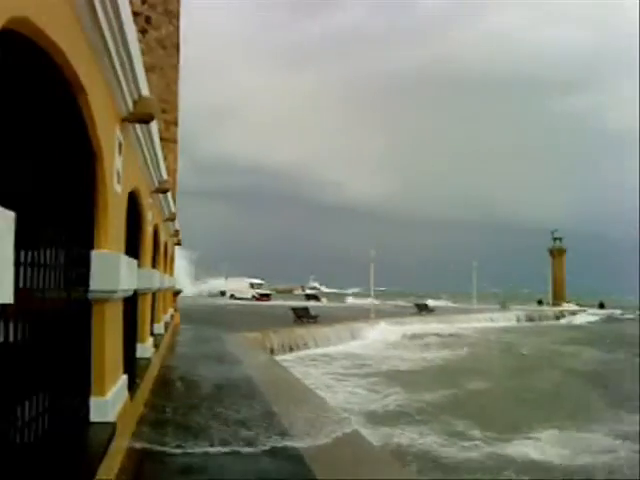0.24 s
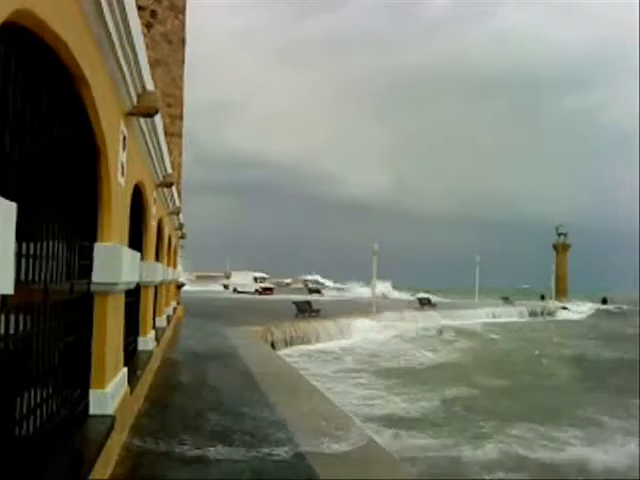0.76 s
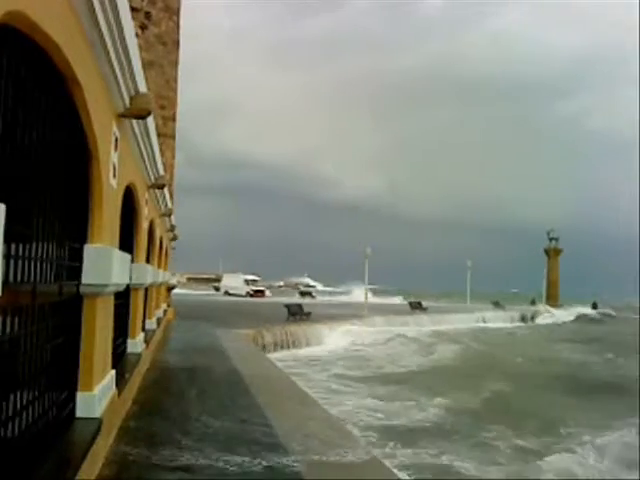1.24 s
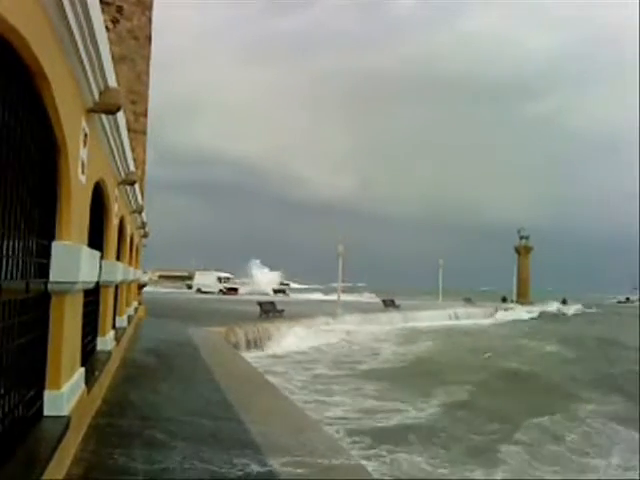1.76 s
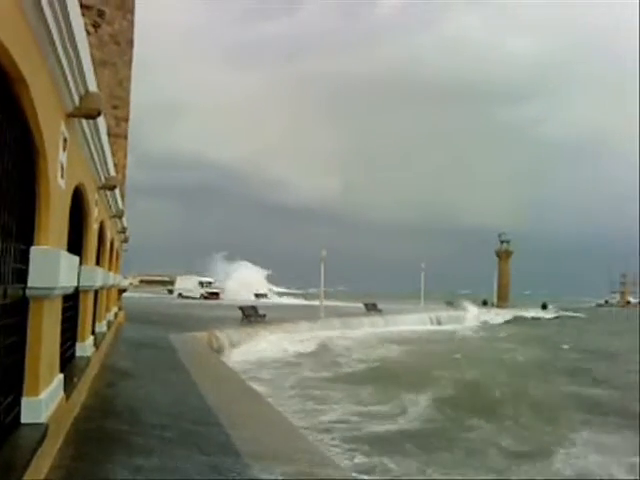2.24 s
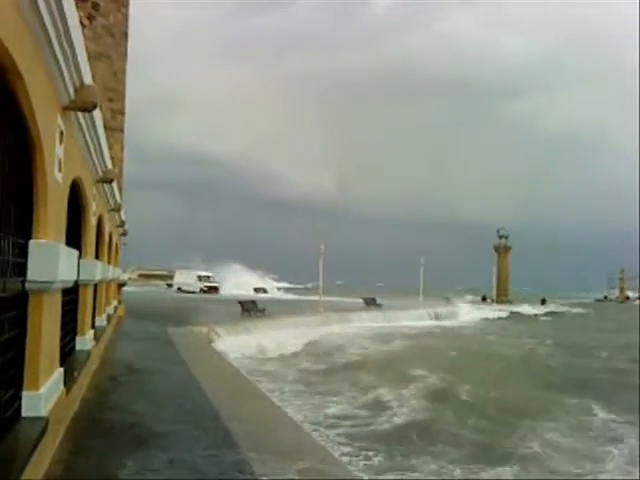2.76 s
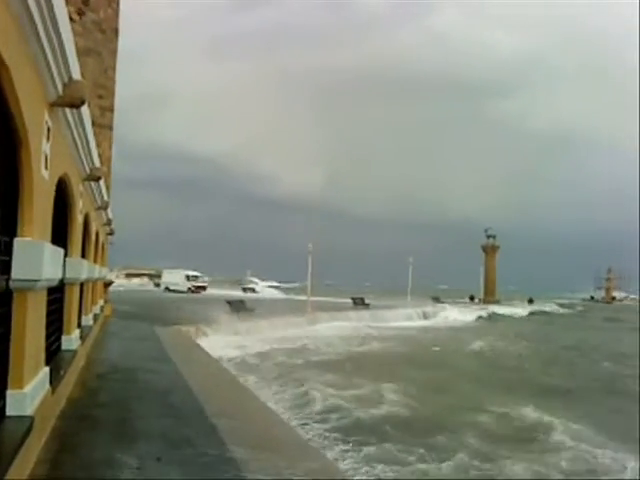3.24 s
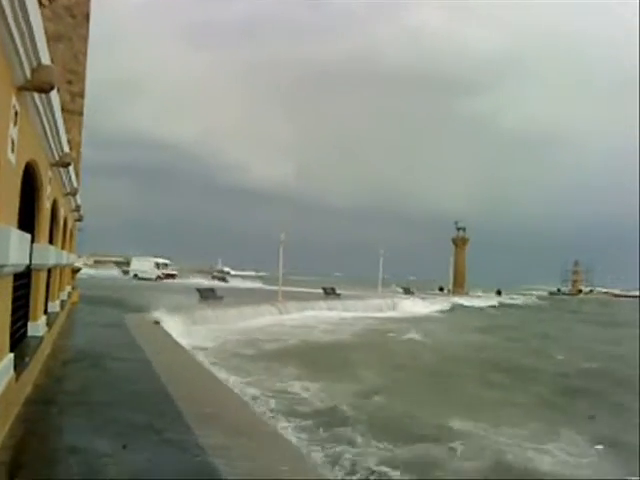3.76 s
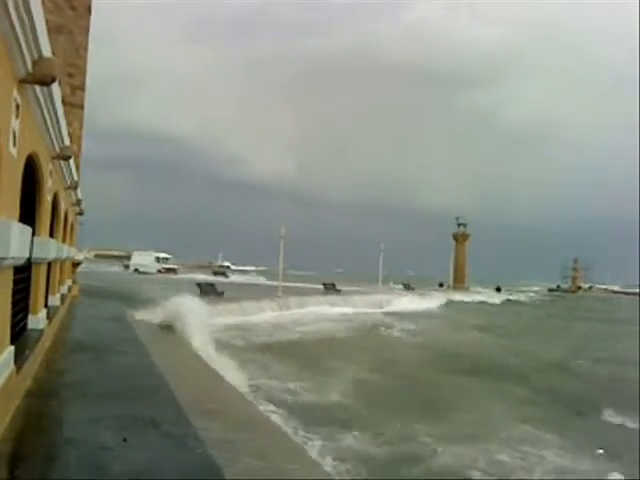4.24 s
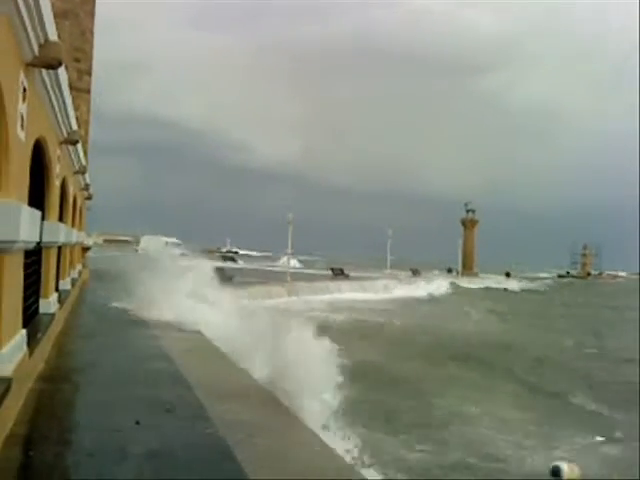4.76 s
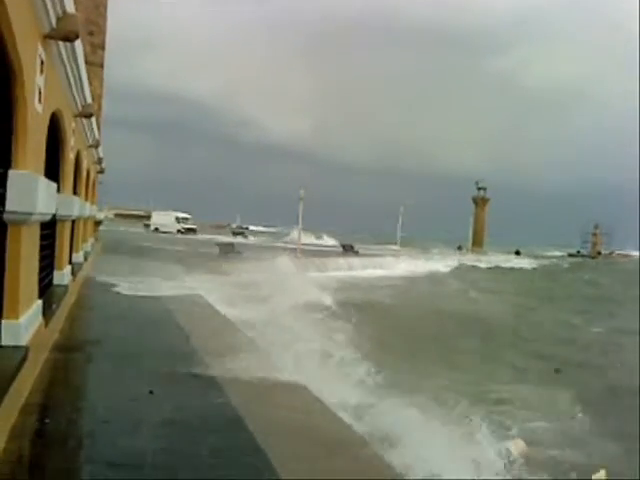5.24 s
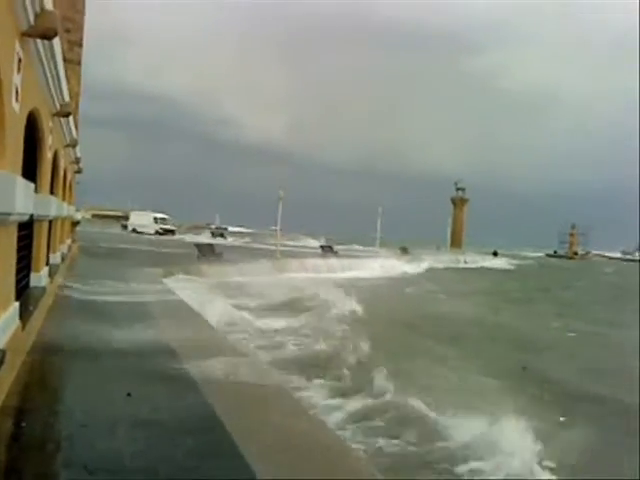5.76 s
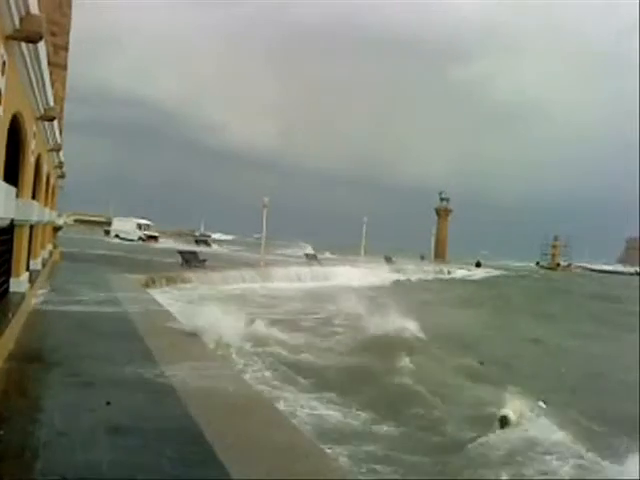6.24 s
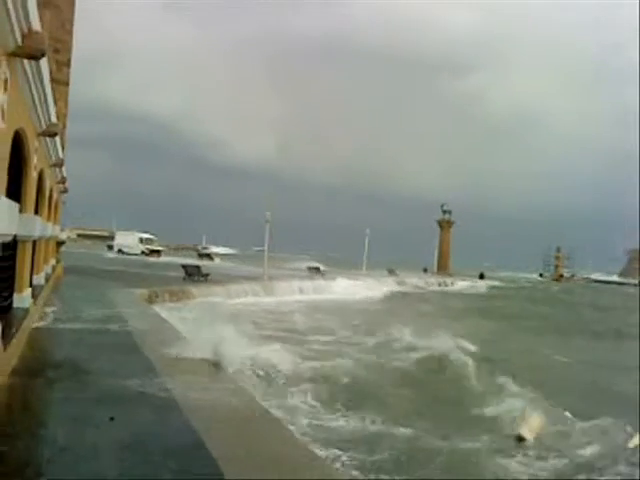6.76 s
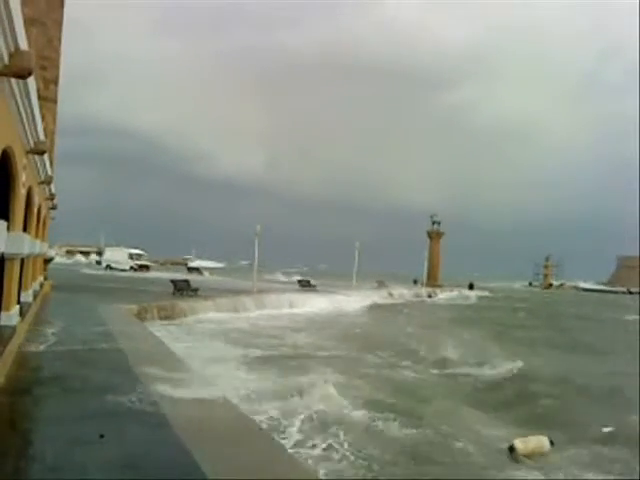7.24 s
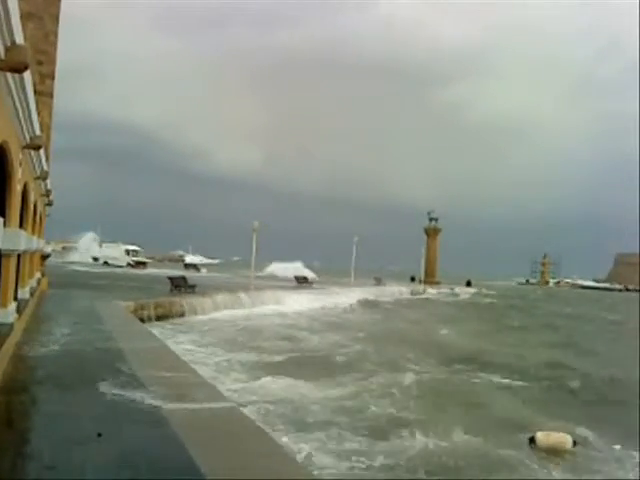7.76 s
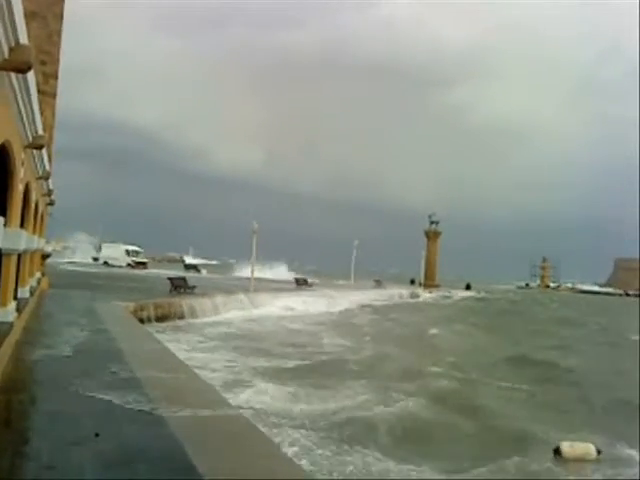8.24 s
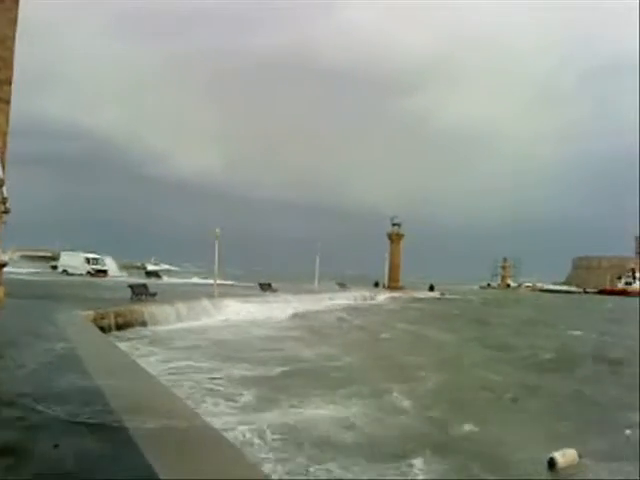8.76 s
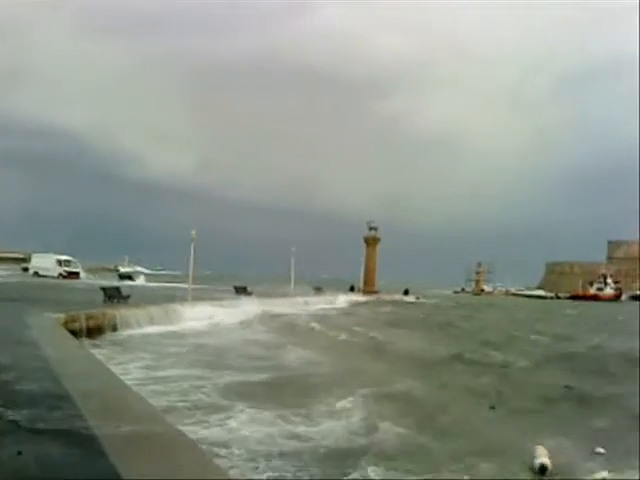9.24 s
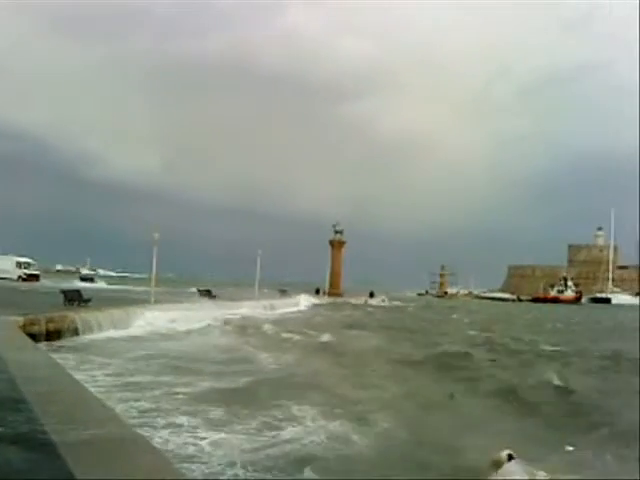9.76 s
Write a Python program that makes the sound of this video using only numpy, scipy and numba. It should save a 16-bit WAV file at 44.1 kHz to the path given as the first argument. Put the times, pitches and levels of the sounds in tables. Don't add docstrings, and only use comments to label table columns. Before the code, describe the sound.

An open harbour quay in a gale, heard through a small unprotected camera microphone. Wind dominates from the first instant: low irregular thumps, rough tearing flutter and sharp spitting puffs. Behind it surf hisses and roars along the stone wall, swelling from about two seconds, with waves slapping around four and a half. Short lulls uncover the foam, then the blows return; automatic gain makes the sea duck and creep back.

```python
import sys
import numpy as np
from scipy import signal
from scipy.fft import rfft, irfft
from scipy.io import wavfile
from scipy.ndimage import uniform_filter1d
from numba import njit

SR = 44100
rng = np.random.default_rng(int(sys.argv[2]) if len(sys.argv) > 2 else 0)


def master_out(mix):
    frames = np.transpose(np.atleast_2d(mix))
    ceiling = np.clip(frames, -1, 1)
    pcm = np.round(ceiling * 32767).astype(np.int16)
    wavfile.write(sys.argv[1], SR, pcm)


def amplitude_ratio(level_db):
    exponent = np.asarray(level_db, float) / 20
    return 10 ** exponent


N = 441000


def unit(x):
    return x / np.sqrt(np.mean(x ** 2))


def curves(table):
    s, *columns = np.transpose(table)
    return [np.interp(np.arange(N) / SR, s, c) for c in columns]


def colour(x, shape):
    hz, db = np.transpose(shape)
    log_hz = np.log(np.arange(1, N // 2 + 2) * SR / N)
    gain_db = np.interp(log_hz, np.log(hz), db, -90, -90)
    return irfft(rfft(x) * amplitude_ratio(gain_db), N)


@njit
def lowpass(x, corner_hz, damp):
    y, band, low = np.empty(len(x)), 0., 0.
    for i in range(len(x)):
        g = np.tan(np.pi * corner_hz[i] / SR)
        v = (band + g * (x[i] - low)) / (1 + g * (g + damp))
        y[i] = low + g * v
        band = 2 * v - band
        low = 2 * y[i] - low
    return y


def walk(rate_hz):
    k = int(SR / rate_hz)
    held = np.repeat(rng.standard_normal(N // k + 1), k)[:N]
    slewed = uniform_filter1d(held, k)
    return unit(uniform_filter1d(slewed, k))


def churn(slow_db, quick_db, slow_hz, quick_hz):
    flutter_db = slow_db * walk(slow_hz) + quick_db * walk(quick_hz)
    return rng.standard_normal(N) * amplitude_ratio(flutter_db)


def spells(start_s, length_s, height, edge_s):
    t, out = np.arange(N) / SR, np.zeros(N)
    for s, length, h in zip(start_s, length_s, height):
        at = slice(max(int((s - edge_s) * SR), 0), int((s + length + edge_s) * SR))
        ramp = np.minimum(t[at] - s, s + length - t[at]) / edge_s
        out[at] += h * np.sin(np.pi / 4 * (1 + np.clip(ramp, -1, 1))) ** 2
    return out


def swells(base_db, events, edge_s, lift_db=0):
    start_s, length_s, peak_db = np.transpose(events)
    extra_power = spells(start_s, length_s, amplitude_ratio(2 * (peak_db + lift_db)), edge_s)
    return 10 * np.log10(amplitude_ratio(2 * base_db) + extra_power)


def ducking():
    # start_s, drop_db
    ducks = [
        (2.249, 9),
        (2.9, 3.5),
        (4.76, 4.5),
        (6.46, 7.5),
        (6.65, 4),
        (7.72, 3.5),
        (8.19, 4.5),
        (8.27, 4.5),
        (8.74, 3.5),
    ]
    attack_s, recover_s = 0.017, 0.83
    t, gain_db = np.arange(N) / SR, np.zeros(N)
    for s, drop_db in ducks:
        since_s = np.maximum(t - s, 0)
        gain_db -= drop_db * (1 - np.exp(-since_s / attack_s)) * np.exp(-since_s / recover_s)
    return gain_db


def surf():
    # start_s, hiss_db, roar_above_hiss_db
    sea_levels = [(0.0, -43, 5), (0.3, -48.5, 0.5), (1.3, -42.5, -3.5), (1.5, -37.5, -3), (2.1, -36, -2),
                  (2.7, -35.5, -1.5), (3.0, -36.5, 1), (3.7, -44, 0), (4.05, -38.5, -1.7), (4.7, -41, 1),
                  (5.75, -35, -2), (6.4, -36, -2), (7.1, -41.5, -0.3), (7.6, -36.5, -1.5), (8.1, -38, 0.3),
                  (9.5, -40, 0), (9.66, -35.5, -4), (10.0, -35.5, -1)]
    # start_s, length_s, surf_rise_db, slam_above_hiss_db
    waves = [(0.0, 0.11, 0, -7), (0.293, .05, 2, 9), (1.055, 0.32, 1, -14), (1.813, 0.26, 1.5, -5),
             (3.107, 0.091, -0.7, 7), (4.28, .1, 1.5, -12), (4.47, 0.14, 0.1, 6), (4.66, .08, .2, 4),
             (4.84, .08, 0, 5), (4.992, 0.32, -1, 3), (6.15, 0.11, 1.5, -11), (6.67, 0.033, -1.5, 10.5),
             (7.548, 0.1, -0.5, -4), (7.937, 0.12, 1, -5), (8.24, 0.041, 2, -1), (8.66, 0.069, 1.5, 7),
             (9.597, 0.11, 3.5, -16)]
    # freq_hz, level_db (per Hz)
    roar_shape = [(60, -27.5), (150, 8), (400, 15), (900, 12), (1300, 15.5), (1820, 15.5), (2180, 9),
                  (3000, 1.5), (4000, -13.5)]
    # freq_hz, level_db (per Hz)
    hiss_shape = [(1500, -19), (2800, -2), (4500, -1), (5300, -0.5), (6000, 1.5), (7500, -2.5),
                  (8500, -9.5), (9000, -17.5), (9400, -19), (9900, -24)]
    # freq_hz, level_db (per Hz)
    slam_shape = [(250, -4.5), (400, 11.5), (700, 18), (1100, 10.5), (1500, 8.5), (2200, -18)]
    wave_edge_s, coarse_db = 0.065, 0.35

    hiss_db, roar_db = curves(sea_levels)
    start_s, length_s, rise_db, slam_db = np.transpose(waves)
    hiss_db = hiss_db + spells(start_s, length_s, rise_db, wave_edge_s)
    slam = spells(start_s, length_s, amplitude_ratio(slam_db), wave_edge_s)

    low_foam, high_foam, body = (churn(0.76, 0.6, slow_hz=14, quick_hz=120) for _ in range(3))
    droplets_per_s = 600
    spray = rng.standard_normal(N) * (rng.random(N) < droplets_per_s / SR) * 3.0
    coarse = colour(low_foam + spray, [(20, -9.5), (4500, 0), (6500, -17.5)])
    fine = colour(high_foam, [(4000, -9.5), (5500, -2.5), (20000, 2.5)])
    foam = amplitude_ratio(coarse_db) * coarse + fine
    scale = np.std(colour(high_foam, [(5500, -0.5), (7500, -3), (9000, -18.5)]))

    hiss = colour(foam, hiss_shape)
    roar = amplitude_ratio(roar_db) * colour(body, roar_shape)
    slaps = slam * colour(body[::-1], slam_shape)
    return amplitude_ratio(hiss_db + ducking()) / scale * (hiss + roar + slaps)


def puffs():
    # start_s, peak_db, breadth (0-1), sharpness_db
    strong = [(0.041, -19, 0.76, 6.5), (0.0842, -19, 0.9, 3.5), (0.2139, -21, .6, 2.5),
              (0.3591, -19, .54, 4.5), (0.404, -14, .37, 4), (0.4344, -16, 0.5, -0.5),
              (0.7344, -19, 0.5, 3), (2.9145, -20.5, .4, 6), (2.9594, -20.5, 0.9, 7),
              (3.0304, -13, 0.65, -2.5), (3.2061, -16, .36, 2), (3.478, -15, .35, 0), (3.9439, -22, 0.6, 6),
              (4.0114, -17.5, 0.55, 0.5), (4.3375, -19.5, 1, 5), (5.47, -16.5, 1, 0.5),
              (6.5151, -10, 0.93, -4), (6.643, -16, 0.21, 7), (7.2135, -21, .43, 6), (7.3223, -15, 1, -0.5),
              (7.4041, -17, 1, 3), (7.4604, -18, 1, 4.5), (7.9294, -18.5, .6, -2.1), (8.1259, -15, 0.7, -1),
              (8.1894, -10, 1, -4), (8.6575, -23, 0.35, 6), (8.6844, -17.5, 0.43, 6.5),
              (8.7074, -17.5, 0.5, 6), (8.9251, -17.5, 0.46, 3), (9.212, -9.5, 0.4, -8)]
    # start_s, peak_db, sharpness_db
    faint = [(0.295, -21, 3), (0.322, -24, -1), (0.5741, -27, 7), (0.6978, -23, 3), (3.1694, -14, -4),
             (3.3894, -24, 6), (4.59, -24, 0), (4.705, -23, 0), (5.4311, -18, 1), (6.57, -26, 7),
             (6.628, -22, 7), (6.666, -28, -8), (0.473, -17, -1), (0.884, -24, 0), (1.615, -25, 2),
             (1.964, -24, -1), (2.751, -21, 0), (2.852, -25, -2), (3.266, -20, -1), (4.516, -22.5, -1),
             (4.851, -29, -1), (5.059, -22, -2), (5.179, -27, -2), (5.779, -25, 0), (5.906, -22, 0.5),
             (6.118, -24, 0), (6.24, -19, -3), (7.897, -19, 0), (8.584, -24, -2), (8.899, -27, 0),
             (6.8364, -33, 11), (7.495, -23, 1), (7.7403, -24, 15), (8.6244, -17.5, 1), (8.7535, -19.5, 3),
             (9.059, -24, 7), (9.1644, -19.5, 3)]
    spit_breadth = 0.54
    every = list(strong) + [(s, db, spit_breadth, sharp_db) for s, db, sharp_db in faint]

    t, strength, corner_hz = np.arange(N) / SR, np.zeros(N), np.full(N, 2000.)
    for s, db, breadth, sharp_db in sorted(every):
        at = slice(max(int((s - 0.03) * SR), 0), int((s + 0.067) * SR))
        width_s = 0.023 * np.clip(breadth, 0.08, 1)
        strength[at] += amplitude_ratio(db) * np.exp(-((t[at] - s - 0.32 * width_s) / width_s) ** 2)
        corner_hz[int(s * SR) - 300:] = np.clip(2500 * amplitude_ratio(sharp_db), 300, 9000)

    rough = churn(0.5, 2, slow_hz=150, quick_hz=600)
    air_shape = [(150, -11.0), (400, -5.0), (2000, -7.5), (4000, -13.5), (7000, -18.0), (9000, -42)]
    air = unit(colour(rough, air_shape))
    return strength * lowpass(air, corner_hz, 2.78) * amplitude_ratio(-1.0)


def swirl(events, width_s):
    t, out, wander = np.arange(N) / SR, np.zeros(N), amplitude_ratio(1.13 * walk(60))
    for s, db, beat_hz in events:
        at = slice(int((s - 0.05) * SR), int((s + 0.08) * SR))
        cycles = np.cumsum(beat_hz * wander[at]) / SR
        envelope = np.exp(-((t[at] - s - 0.008) / width_s) ** 2)
        out[at] += amplitude_ratio(db - 5.0) * envelope * np.sin(2 * np.pi * cycles)
    return out


def thuds():
    # start_s, peak_db, beat_hz
    lip_beats = [(0.348, -15, 306), (0.31, -12, 200), (0.63, -13, 260), (4.0, -12, 300), (4.5, -12, 170),
                 (3.57, -13, 240), (3.999, -23, 180), (5.899, -16, 240), (6.511, -12, 278),
                 (6.689, -24, 196), (7.689, -5.5, 280.7), (8.208, -6, 230), (9.209, -2, 177)]
    # start_s, peak_db, beat_hz
    heavy_blows = [(2.259, -2, 61.7), (3.359, 0, 67.3), (4.335, -2, 60), (2.4, -11, 60), (7.62, -6, 70),
                   (0.825, -6, 75), (9.58, -5, 60), (5.53, -4, 70), (1.55, -9, 100), (4.789, -3, 63),
                   (6.642, -2, 65), (7.224, -5, 121), (2.845, -8, 110), (3.055, -6, 130.6),
                   (3.272, -3, 116), (3.425, -2.5, 141.5), (3.472, -6, 108), (4.38, -2, 75),
                   (4.695, -3, 80), (0.685, -7, 110), (0.715, -9, 87.5), (5.587, -7, 109), (8.155, -3, 121),
                   (8.705, -14, 99), (8.755, -6, 91)]
    return swirl(lip_beats, width_s=0.015) + swirl(heavy_blows, width_s=0.01)


def kicks():
    # start_s, peak_db, breadth_ms
    strong_whirls = [(0.036, -5.5, 1.6), (0.152, -7, 1.8), (0.2233, -11.6, 2.9), (0.309, -4.5, 1.4),
                     (0.4072, -4.5, 1.4), (0.4295, -9, 1), (0.473, -9.7, 2.0), (0.4961, -9, 1.5),
                     (0.5502, -8.8, 1.2), (0.6193, -7, 1.1), (0.645, -9.2, 1.1), (0.6899, -10, 2.3),
                     (0.745, -12, 1.3), (0.8126, -7, 1.7), (2.0968, -9.0, 2.1), (2.267, -7.5, 2.8),
                     (2.7518, -13, 1.2), (2.8533, -5, 1.8), (2.897, -7.4, 2.0), (2.9328, -3.5, 1.5),
                     (2.9688, -10, 2.2), (3.0615, -1, 1.4), (3.115, -14, 3.3), (3.209, -5, 1.1),
                     (3.2757, -6, 1.4), (3.3651, -8, 3.8), (3.4331, -3, 1.6), (3.4803, -7.5, 1.6),
                     (3.526, -15, 1.4), (3.6597, -12, 1.2), (3.7832, -9.5, 1.5), (3.9895, -6, 1.3),
                     (4.337, -9, 1.1), (4.39, -9, 2.4), (4.524, -7, 1.8), (4.5931, -7, 0.83),
                     (4.7144, -6.3, 1.3), (4.8039, -7, 2.5), (4.855, -9.0, 2.8), (5.4074, -7.6, 1.2),
                     (5.5953, -8.5, 1.6), (5.866, -8, 1.6), (6.1594, -7, 1.4), (6.4626, -6, 2),
                     (6.6472, -7, 2.3), (7.2122, -7.5, 1.06), (7.3393, -6, 1.75), (7.4691, -8, 3.3),
                     (7.5134, -8, 1.6), (7.6118, -12, 2.5), (7.6898, -3, 1.2), (7.8277, -9, 2),
                     (8.159, -4.5, 2.1), (8.2095, -9, 1.1), (8.69, -4.5, 1.5), (8.71, -9, 2.7),
                     (8.7642, -7, 2.7), (8.9554, -8.5, 3.5), (9.1852, -7, 1.6), (9.2187, -6, 1.6)]
    clear_share, clear_s = 0.69, 0.0084
    t, out, gap = np.arange(N) / SR, np.zeros(N), np.ones(N)
    signs = rng.choice([-1, 1], len(strong_whirls))
    for (s, db, breadth_ms), sign in zip(strong_whirls, signs):
        at = slice(max(int((s - 0.03) * SR), 0), int((s + 0.03) * SR))
        u = (t[at] - s) / (breadth_ms * 0.00079)
        out[at] += sign * amplitude_ratio(db) * (1 - u ** 2) * np.exp(-u ** 2 / 2)
        gap[at] *= 1 - clear_share * np.exp(-((t[at] - s) / clear_s) ** 2)
    return out, gap


def buffet():
    # start_s, big_db, small_above_big_db, air_speed_db
    wind = [(0.0, -18.5, -9, 5), (0.6, -17.5, -2.5, -1.3), (1.0, -19.5, -2.5, -2), (1.4, -25.5, -12.5, 0.5),
            (2.1, -18.5, 0, -2.5), (2.8, -18, -3, 1.4), (3.6, -17, -4, 0.3), (4.2, -19.5, -3.5, -1.5),
            (4.6, -20.5, -0.5, 1), (5.1, -20.5, -1.5, 1.5), (5.7, -21.5, -4.5, -4.5), (6.4, -18, -6, -1.2),
            (7.3, -14.5, -7, 0.3), (7.7, -19, -4, -2), (8.2, -16.5, -10, 2.5), (8.7, -16, -8.5, 3.5),
            (9.2, -19.5, -3.5, -1.5), (10.0, -25.5, -6, -1.5)]
    # start_s, length_s, depth_db
    lulls = [(0.173, 0.11, 2.5), (0.837, 0.03, 4), (1.297, .1, 1.5), (1.756, 0.048, 3), (3.706, .06, -0.5),
             (5.0, 0.26, 2.5), (7.016, 0.11, 1.5), (9.4, 0.07, 1), (1.87, .04, 1), (2.313, 0.41, 9.5),
             (2.14, 0.095, 4.5), (3.13, 0.036, -1), (3.307, 0.03, 7), (3.417, 0.058, 6), (3.746, 0.23, 3),
             (4.422, .05, 9), (4.125, 0.16, 4.5), (5.62, 0.24, 3), (5.993, .05, 3.5), (6.1, .07, 3),
             (6.2, .1, 2), (4.903, .08, 0.5), (0.38, .02, 5), (0.515, .02, 4), (8.04, .02, 3),
             (3.8, .04, 3), (4.63, .05, 3), (1.84, .05, 3), (2.79, .04, 2.5), (6.545, .02, 3),
             (8.81, .04, 3.5), (6.38, .04, 0), (6.535, 0.034, 9), (6.665, 0.5, 8), (6.767, 0.37, 6.5),
             (7.26, 0.031, 11), (7.54, 0.091, 5), (7.764, 0.064, 3.5), (8.309, 0.25, 14.5),
             (8.785, 0.054, 4), (8.968, 0.046, 4.5), (9.252, 0.11, -0.5), (9.758, 0.076, 3)]
    # start_s, length_s, peak_db
    gusts = [(0.056, 0.089, -16), (0.365, 0.039, -15), (0.67, 0.068, -17), (0.783, 0.046, -13),
             (1.52, .14, -23), (1.693, 0.044, -18), (2.43, .06, -26), (4.45, .08, -18), (8.715, 0.028, -18),
             (3.92, .03, -21), (5.924, .06, -21), (7.62, .06, -23), (9.22, .05, -23), (1.853, 0.062, -17),
             (2.043, 0.05, -17), (2.228, 0.057, -14), (2.746, 0.022, -12), (2.862, 0.12, -14),
             (3.076, 0.05, -11), (3.19, 0.044, -15), (3.26, 0.045, -16), (3.337, 0.034, -18),
             (3.584, 0.09, -24.5), (3.957, 0.079, -17), (4.32, 0.11, -19.5), (4.676, 0.12, -17.5),
             (5.394, 0.086, -14), (5.505, 0.088, -15.5), (6.206, 0.089, -19), (6.433, 0.12, -12),
             (6.627, 0.044, -26), (7.2, 0.044, -21.5), (7.44, 0.052, -16), (8.05, 0.037, -10.5),
             (8.135, 0.15, -17.5), (8.667, 0.068, -24), (9.05, 0.13, -17), (9.574, 0.032, -20)]
    # start_s, length_s, peak_db
    rushes = [(0.016, 0.083, -20.0), (0.345, 0.03, -17), (0.413, 0.034, -14), (0.618, 0.062, -17),
              (1.692, 0.07, -21), (2.055, 0.055, -19), (2.897, 0.082, -19.5), (3.04, 0.064, -17.5),
              (3.267, 0.023, -14.5), (0.455, .035, -20), (0.73, .03, -19), (3.142, 0.043, -18.5),
              (2.26, .04, -20), (8.67, 0.011, -14), (4.41, 0.038, -22), (4.76, 0.036, -23),
              (7.74, .04, -23), (9.196, .03, -19), (6.676, .03, -22.5), (3.85, 0.031, -25.5),
              (5.68, .03, -21), (3.397, 0.045, -21), (3.576, 0.028, -18), (3.967, 0.064, -15.5),
              (4.33, 0.084, -19), (4.5, 0.03, -16.5), (4.57, 0.034, -28), (5.265, 0.072, -21),
              (5.354, 0.081, -15.5), (5.898, 0.049, -16.5), (6.142, 0.036, -16), (6.32, 0.044, -20),
              (6.479, 0.049, -16), (6.564, 0.035, -17.5), (7.166, 0.042, -25), (7.3, 0.053, -21.5),
              (7.66, 0.044, -15), (7.884, 0.036, -17.5), (8.07, 0.07, -21), (8.189, 0.052, -18.5),
              (8.646, 0.058, -20), (9.147, 0.064, -20)]
    # freq_hz, level_db (per Hz)
    thump_shape = [(12, -32.5), (25, -3.5), (50, -0.5), (120, -1), (200, -6), (320, -14.5), (600, -42)]
    # freq_hz, level_db (per Hz)
    tear_shape = [(100, -25), (200, -4), (300, -2.5), (800, -4.5), (1700, -5), (2500, -9.5), (5000, -2),
                  (8000, -28.5)]

    wind_db, tear_db, speed_db = curves(wind)
    start_s, length_s, depth_db = np.transpose(lulls)
    wind_db = wind_db - spells(start_s, length_s, depth_db, edge_s=0.04)
    big_db = swells(wind_db, gusts, edge_s=0.028, lift_db=-1.9)
    small_db = swells(wind_db + tear_db, rushes, edge_s=0.011)

    flutter = amplitude_ratio(0.9 * walk(22) + 0.78 * walk(60))
    whirls_per_s = 110
    struck = rng.random(N) < whirls_per_s / SR
    whirls = struck * rng.standard_normal(N) * amplitude_ratio(22 + 0.8 * rng.exponential(size=N))

    slow_air = churn(0.88, 0.88, slow_hz=9.9, quick_hz=31)
    big = unit(flutter * colour(slow_air + 0.55 * whirls, thump_shape))
    big = unit(np.tanh(big / 2.9))

    small = flutter * colour(churn(0.61, 1.8, slow_hz=30, quick_hz=150), tear_shape)
    blunt = colour(whirls, [(150, -22.0), (250, 0.5), (450, -5.5), (1200, -21.0)])
    corner_hz = np.clip(650 * amplitude_ratio(speed_db + 1.03 * walk(30)), 120, 8000)
    small = unit(lowpass(small + 0.5 * blunt, corner_hz, 1.57))
    return amplitude_ratio(big_db) * big + amplitude_ratio(small_db - 2.0) * small


def scene():
    sea, eddies, spits, beats = surf(), buffet(), puffs(), thuds()
    kick, gap = kicks()
    return (sea + spits + gap * (eddies + beats) + kick)[None]


def thin(x):
    # freq_hz, level_db
    faintest = [(2500, -10), (3400, -6), (4700, -5.5), (5200, -3), (5700, -5.5), (7600, -5), (8000, -3),
                (8500, -5), (9000, -2.5), (9300, .5), (9600, 3), (9800, 9)]
    how = dict(window="cosine", nperseg=4096, noverlap=2048)
    hz, _, cells = signal.stft(x, SR, **how)
    power = np.abs(cells[:2046].reshape(341, 6, -1)) ** 2
    line_db = 10 * np.log10(power.mean(axis=1) + 1e-18)
    thump_db = line_db[1:5].mean(axis=0) - line_db[93:120].mean(axis=0)
    floor_db = uniform_filter1d(line_db, size=7, axis=0)
    floor_db = floor_db + np.interp(hz[:2046:6], *np.transpose(faintest))[:, None]
    floor_db = floor_db + 0.2 * (thump_db - thump_db.mean()) + rng.standard_normal(line_db.shape)
    cells[:2046] *= np.repeat(line_db > floor_db, 6, axis=0)
    return signal.istft(cells, SR, **how)[1][:N]


def roll_off(x):
    return signal.sosfilt(signal.butter(12, 9780, fs=SR, output="sos"), x)


def record(dry):
    ceiling = 0.85
    rounded = dry[0] / (1 + np.abs(dry[0] / ceiling) ** 4) ** 0.25
    mix = thin(rounded)[None]
    return roll_off(mix)


dry = scene()
out = record(dry)
master_out(out)
```